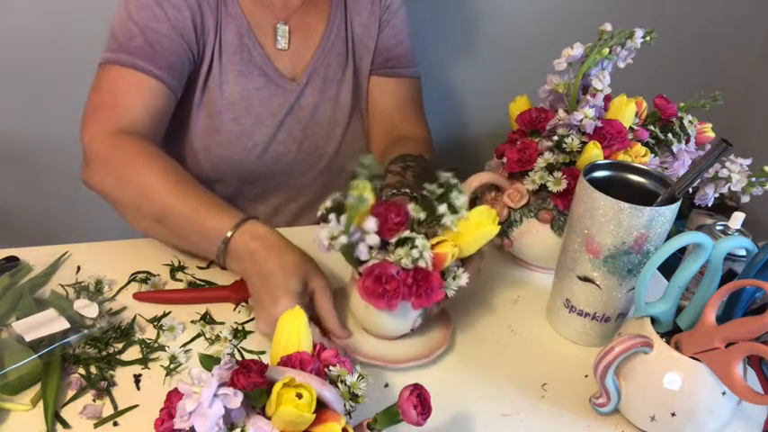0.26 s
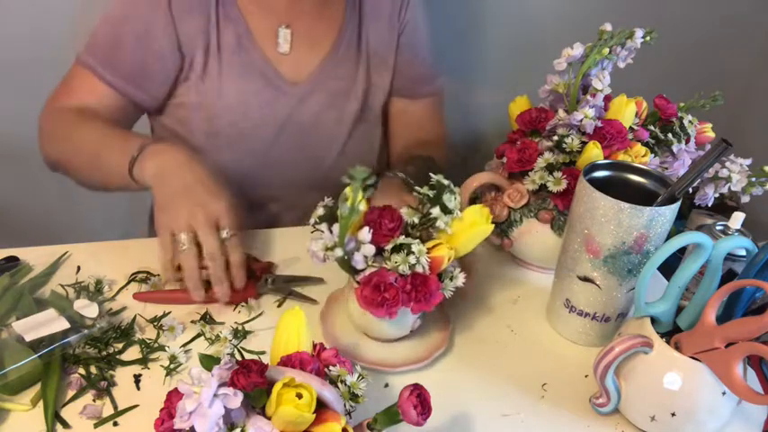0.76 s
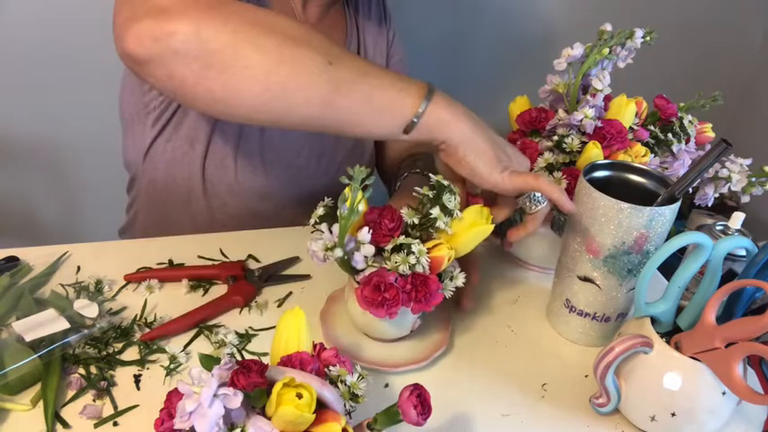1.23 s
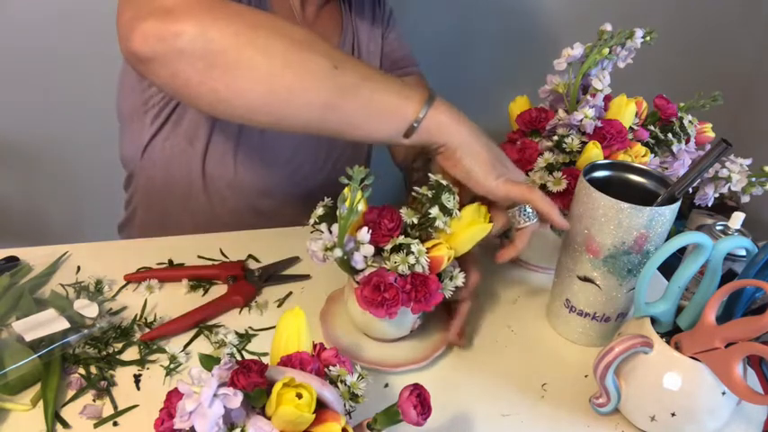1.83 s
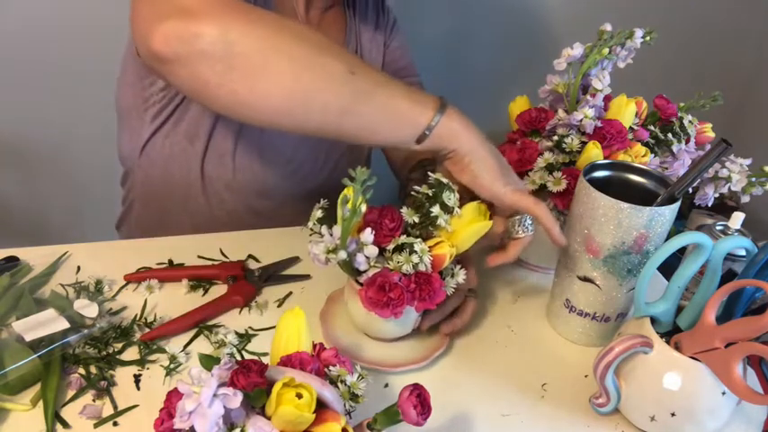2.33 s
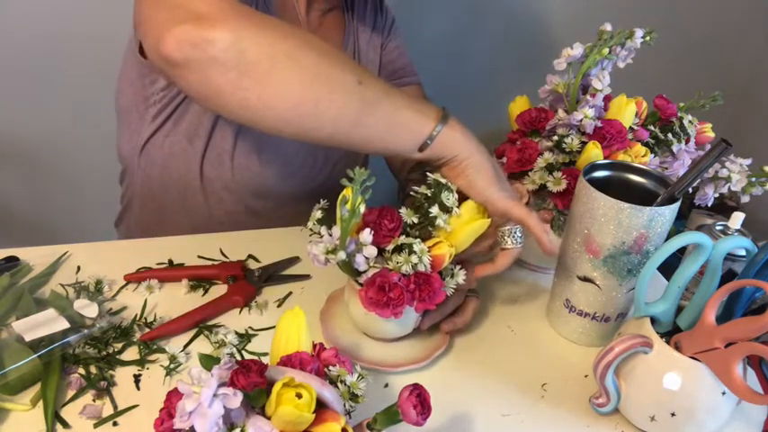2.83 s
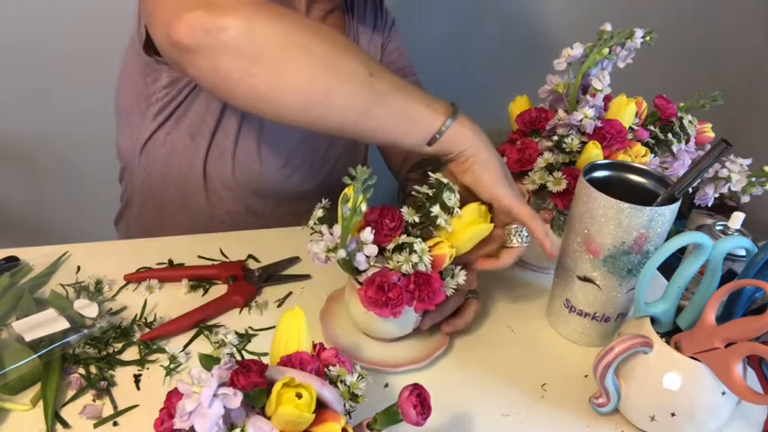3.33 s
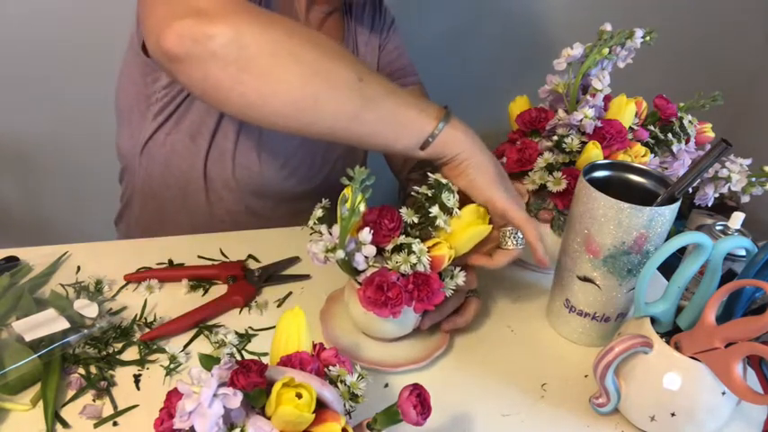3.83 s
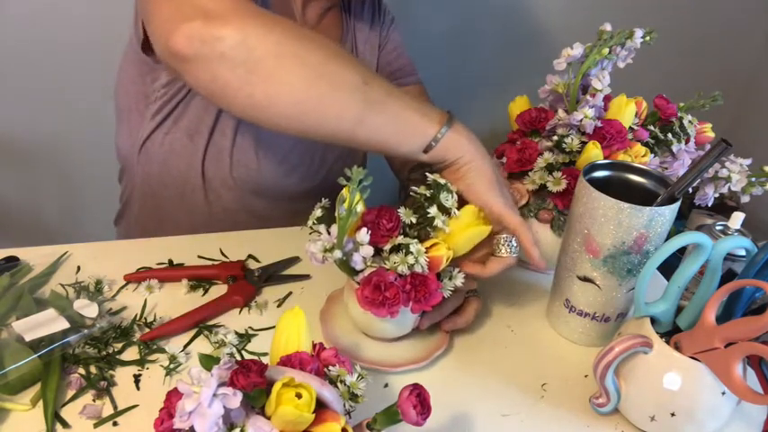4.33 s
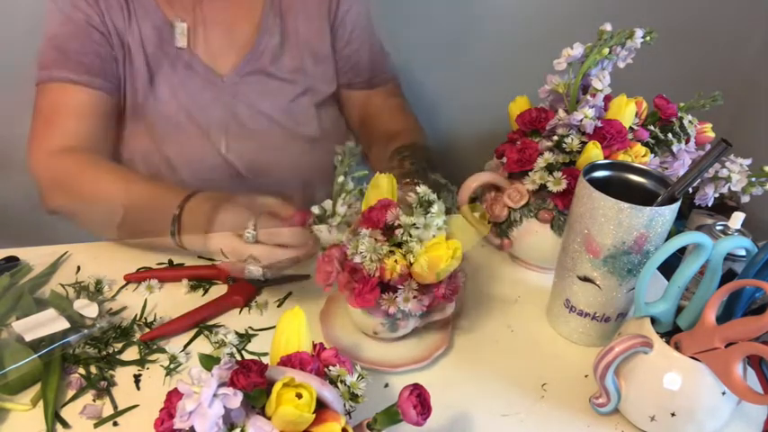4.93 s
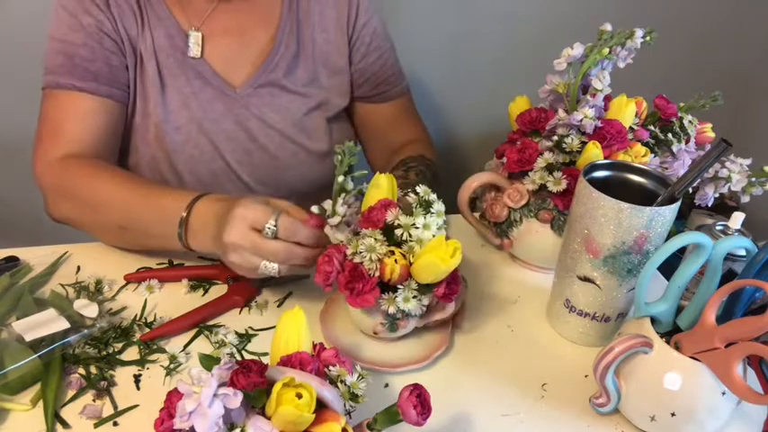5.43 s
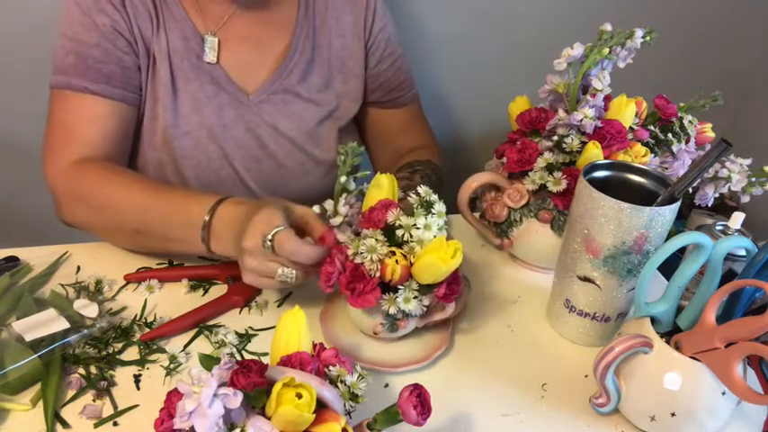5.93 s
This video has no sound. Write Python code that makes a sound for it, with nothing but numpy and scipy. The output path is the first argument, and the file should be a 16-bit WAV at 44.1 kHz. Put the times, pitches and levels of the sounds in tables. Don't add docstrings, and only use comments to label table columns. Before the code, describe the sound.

Heavy, damped china on china, heard very near, with a short small-room reflection. An opening clatter and dull tabletop knock give way to scraping, rattling contacts as the cup is rotated, then a softer landing. Quiet middle: faint motor hum, brushed leaves, isolated thin rim pings. Late scrapes and nudges build to one hard, bright set-down with a fast rocking rattle, then soft rustles and stem ticks.

```python
import sys
import numpy as np
from scipy import signal
from scipy.fft import rfft, irfft, next_fast_len
from scipy.io import wavfile
from scipy.ndimage import uniform_filter1d

SR = 44100
rng = np.random.default_rng(int(sys.argv[2]) if len(sys.argv) > 2 else 0)


def log_audio(samples):
    frames = np.atleast_2d(samples).T
    limited = np.clip(frames, -1, 1)
    pcm = np.round(limited * 32767).astype(np.int16)
    wavfile.write(sys.argv[1], SR, pcm)


def voltage_ratio(decibels):
    exponent = np.asarray(decibels, float) / 20
    return 10 ** exponent


N = 272160

# pitch_hz [Hz], width_hz [Hz], level_db [dB]
CLACK = [(1960, 250, -7.5), (2413, 168, -8.5), (3100.6, 220, -2.5), (3818, 320, -4), (4220, 230, -8),
         (4656, 260, -7), (5361, 250, -13.5), (6281, 450, -12.5)]
# pitch_hz [Hz], width_hz [Hz], level_db [dB]
BOWL = [(459.7, 37, -15.5), (695.1, 150, -6), (898.4, 130, 2), (1057.1, 124.76, 2), (1399, 200, -1.5),
        (1667.1, 150, 2)]
# drag_db [dB], brush_db [dB], fizz_db [dB]
REST_DB = [-81.5, -83, -86]


def unit(x):
    return x / np.sqrt(np.mean(x ** 2) + 1e-20)


def along(points, hz):
    f, v = np.transpose(points)
    return np.interp(np.log(hz + 1), np.log(f + 1), v)


def filtered(x, response):
    m = next_fast_len(N + SR // 2)
    spectrum = rfft(x, m) * response(np.fft.rfftfreq(m, 1 / SR))
    return unit(irfft(spectrum, m)[:N])


def coloured(x, points):
    return filtered(x, lambda f: voltage_ratio(along(points, f)))


def add(track, s, db, x):
    track[round(s * SR):][:len(x)] += voltage_ratio(db) * x


def ring(modes, scatter_db, attack, detune, tilt_db=0, size=7000):
    t = np.arange(size) / SR
    hz, width, db = np.transpose(modes)[:, :, None]
    level_luck, pitch_luck = rng.standard_normal((2, len(modes), 1))
    level_db = db + scatter_db * level_luck + tilt_db * np.log2(hz / hz.mean())
    sense = (-1.) ** np.arange(len(modes))[:, None]
    waves = sense * np.sin(2 * np.pi * hz * (1 + detune / 100 * pitch_luck) * t)
    decay = np.exp(-np.pi * abs(width) * t)
    x = (voltage_ratio(level_db) * decay * waves).sum(0) * (1 - np.exp(-t / attack)) ** 2
    return x / abs(x).max()


def muffled(modes, soft_db):
    return [(hz, width, db - max(soft_db, 0) * max(np.log2(hz / 1102.6), 0)) for hz, width, db in modes]


def chatter(x, db):
    when, size = rng.random((2, 6))
    taps = np.zeros(SR // 100)
    taps[(when * .007 * SR).astype(int) + 20] = voltage_ratio(db - 10 * when) * (2 * size - 1)
    taps[0] = 1
    return signal.fftconvolve(x, taps)


def strokes(rows, rest_db):
    t = np.arange(N) / SR
    power = voltage_ratio(rest_db) ** 2
    for s, rise, fade, db in rows:
        fall_db = 20 * np.maximum((s - t) / abs(rise), (t - s) / abs(fade))
        power = power + voltage_ratio(db - fall_db) ** 2
    return np.sqrt(power)


def grit(share, patchy_db):
    grains = (rng.random(N) < .04) * rng.standard_normal(N)
    z = signal.stft(share * unit(grains) + rng.standard_normal(N), nperseg=256)[2]
    field = uniform_filter1d(rng.standard_normal(z.shape), size=3, axis=0)
    field = uniform_filter1d(field, size=20, axis=1)
    return signal.istft(z * voltage_ratio(patchy_db * unit(field)), nperseg=256)[1][:N]


def resonances(modes):
    def response(f):
        total = 0
        for k, (hz, width, db) in enumerate(modes):
            total = total + (-1) ** k * voltage_ratio(db) * 1j * f * width / (hz * hz - f * f + 1j * f * width)
        return total
    return response


def room_tone():
    # pitch_hz [Hz], density_db [dB per Hz]
    air_curve = [(41, -22), (70, -0.5), (86, -23), (108, -2.5), (189, -3), (408, -14), (446, -14.5),
                 (489, -11), (803, -21.5), (962, -18.5), (1510, -27), (4900, -36.5), (15500, -42)]
    # pitch_hz [Hz], peak_db [dB]
    motors = [(53.7, -67.5), (58.82, -65.3), (120, -69)]
    # middle_s [s], half_width_s [s], depth_db [dB]
    ducks = [
        (.92, 0.0885, 6),
        (4.8, 0.17635, 2),
    ]
    start_db, sag_db_per_s, together_s = -59, 0.6261, 2.165
    t = np.arange(N) / SR
    air = filtered(rng.standard_normal(N), lambda f: voltage_ratio(along(air_curve, f)) * (f < 15900))
    hum = sum(voltage_ratio(db + 61) * np.cos(2 * np.pi * hz * (t - together_s)) for hz, db in motors)
    dips_db = sum(db * np.exp(-((t - s) / width) ** 2) for s, width, db in ducks)
    return voltage_ratio(start_db - sag_db_per_s * t - dips_db) * (air + hum)


def tinkles():
    # start_s [s], rim_db [dB], saucer_db [dB], upper_db [dB over rim]
    grazes = [(0.0054, -61, -70, -7.5), (0.0135, -53.5, -66, -11), (0.041, -57.5, -68.5, -1.5),
              (0.0636, -48.5, -45.5, 3.5), (0.2809, -72, -78.5, -4), (0.3093, -67.5, -67, -9.5),
              (.325, -76, -65, -0.5), (0.3388, -69.5, -68, -2.5), (.349, -74, -61.5, 5.5),
              (0.358, -64.5, -60, -3), (0.368, -74, -83.5, 8.5), (0.3918, -58, -73, -9.5),
              (0.6609, -63.5, -75.5, -4), (0.6992, -62.5, -77.5, -4.5), (1.7991, -71.5, -72.5, 0),
              (1.988, -65.5, -77, -5), (2.1938, -62.5, -73.5, -4.5), (2.212, -63.5, -84.5, 1),
              (2.2449, -66.5, -84.5, -3), (2.8208, -75, -85, -2.5), (3.0567, -52.5, -73.5, -4.5),
              (3.476, -60.5, -80, -8.5), (4.1863, -75, -82.5, 0.5), (4.223, -60.5, -82, -9.5),
              (4.245, -78, -82.5, -8), (4.265, -71, -84, -11), (4.2843, -63.5, -90, -25.5),
              (4.425, -59, -84.5, -8.5), (6.1138, -63.5, -81, -10.5)]
    # pitch_hz [Hz], width_hz [Hz], level_db [dB]
    rim_modes = [
        [(4240, 45, -4), (4350, 35, 0)],
        [(4600, 35, 0)],
        [(7000, 30, 0), (7150, 40, -7), (7300, 40, -4)],
        [(10530, 35, 0), (11360, 50, -6)],
        [(9560, 30, 0), (12100, 30, -2)],
    ]
    upper_shares = [6, -2.5, -12.5]
    out = np.zeros(N + SR)
    for s, rim_db, saucer_db, upper_db in grazes:
        levels_db = [rim_db - 4, saucer_db + 4] + [rim_db + upper_db + db for db in upper_shares]
        for modes, db in zip(rim_modes, levels_db):
            add(out, s, db, ring(modes, scatter_db=3, attack=.0008, detune=.4))
    return out[:N]


def china_contact(out, s, clack_db, bowl_db, crack_db):
    # pitch_hz [Hz], width_hz [Hz], level_db [dB]
    crack_modes = [(7300, 1100, 0), (8600, 1200, -1), (10200, 1300, -1), (11800, 1400, -3),
                   (13500, 1500, -8), (15000, 1500, -12)]
    tilt_db = max(clack_db - bowl_db - 13.5, -24.5)
    clack = ring(CLACK, scatter_db=1.5, attack=.00012, detune=1.5, tilt_db=tilt_db, size=1500)
    add(out, s + .0006, clack_db - 1.5, chatter(clack, db=-9))
    bowl_modes = muffled(BOWL, .8 * (bowl_db - clack_db + 5.5))
    add(out, s + .001, bowl_db + 5.5, ring(bowl_modes, scatter_db=1.6, attack=.00024, detune=1, size=2500))
    crack = ring(crack_modes, scatter_db=3, attack=.0001, detune=4, size=400)
    add(out, s + .0006, crack_db + 8.5, chatter(crack, db=-5))


def contacts():
    # start_s [s], clack_db [dB peak], bowl_db [dB], crack_db [dB]
    set_downs = [(0.0537, -33, -46.5, -56), (0.067, -21.5, -25.5, -46.5), (0.0832, -27.5, -54.5, -45.5),
                 (0.0941, -36, -52, -53.5), (0.1, -35.5, -48, -45.5), (0.1041, -32.5, -50, -57),
                 (0.1086, -28, -45.5, -52), (0.196, -32, -44, -75), (0.7294, -47.5, -51.5, -65),
                 (0.7503, -33.5, -50.5, -48.5), (0.7532, -31.5, -43.5, -55), (0.765, -38.5, -39.5, -61),
                 (0.7698, -22.5, -40, -37), (0.7809, -42, -50, -62), (0.801, -38.5, -45.5, -62.5),
                 (0.8118, -40.5, -43, -64.5), (0.8397, -41, -46.5, -68), (1.884, -42.5, -52, -58.5),
                 (1.889, -25, -44.5, -52.5), (1.8955, -34, -53.5, -42.5), (1.9003, -35.5, -52, -58.5),
                 (1.9107, -43.5, -55, -65.5), (2.0695, -49.5, -62, -66), (2.0761, -47.5, -57, -60.5),
                 (2.1011, -36.5, -49.5, -60.5), (2.0956, -28.5, -47, -51), (4.907, -60, -53, -89),
                 (4.941, -69, -56, -85), (4.957, -67, -51, -82.5), (4.9834, -32, -40, -71),
                 (4.9896, -17, -31, -51), (5, -9, -26.5, -39.5)]
    # start_s [s], clack_db [dB peak], bowl_db [dB], crack_db [dB]
    rocks = [(.125, -16, -37, -43.5), (.138, -20.5, -37.5, -50.5), (0.1476, -22.5, -39, -54),
             (0.155, -29.5, -46, -62.5), (.1608, -27, -42.5, -62), (.1712, -32, -44, -65.5),
             (5.0035, -24, -36, -59.5), (5.008, -27.5, -42, -61), (5.0116, -27.5, -38, -58),
             (5.022, -14.5, -32, -44.5), (5.0344, -19, -33.5, -50), (5.0413, -23, -38, -58),
             (5.0489, -29.5, -40.5, -62), (5.0557, -32, -43, -48.5), (5.0716, -37, -46, -70),
             (5.08, -34, -42.5, -72)]
    # start_s [s], clack_db [dB peak], bowl_db [dB], crack_db [dB]
    turns = [(1.0032, -46, -61, -67), (1.05, -25.5, -29.5, -68), (1.134, -40, -49, -72),
             (1.159, -42.5, -46.5, -61.5), (1.211, -27, -31.5, -43), (1.2578, -14.5, -28.5, -47.5),
             (1.2705, -12.5, -23, -51), (1.2769, -33, -38.5, -64), (1.292, -41.5, -50.5, -70.5),
             (1.327, -45.5, -48.5, -76.5), (1.3515, -38.5, -46, -76), (1.3141, -39.5, -42, -74),
             (1.3601, -45.5, -46.5, -64), (1.3798, -51, -46, -76.5), (1.3887, -37, -43.5, -77.5),
             (1.4, -36.5, -41, -77), (1.4538, -58.5, -50.5, -74), (1.4957, -43, -43.5, -79),
             (1.4994, -37, -43.5, -77.5), (1.5038, -39, -44.5, -78), (1.508, -34, -42.5, -76),
             (1.5192, -34.5, -42.5, -78), (1.5223, -26, -34, -74.5), (1.533, -37.5, -43.5, -73),
             (1.5475, -37.5, -46.5, -70.5), (1.5506, -39, -47.5, -70.5), (1.5697, -36, -44, -69),
             (1.5881, -37.5, -48, -65.5), (1.605, -33, -40.5, -56.5), (1.6401, -32, -38, -63.5),
             (1.6447, -32.5, -35.5, -56.5), (1.6554, -37.5, -46, -52.5), (1.6639, -43.5, -47.5, -60.5),
             (1.685, -49.5, -44.5, -77), (1.7149, -34, -44, -62), (1.733, -42, -44.5, -70.5),
             (1.7605, -35, -46, -54.5), (1.7655, -38, -40.5, -69)]
    # start_s [s], clack_db [dB peak], bowl_db [dB], crack_db [dB]
    nudges = [(3.0533, -51, -64, -62), (3.058, -50.5, -50.5, -78), (4.5365, -41, -50, -77),
              (4.5781, -61.5, -43.5, -75), (4.591, -48, -47.5, -56), (4.6155, -54.5, -43.5, -70.5),
              (4.6276, -42.5, -41, -68), (4.6358, -36.5, -41, -52.5), (4.6692, -24.5, -36, -42.5),
              (4.6756, -38, -42.5, -63), (4.68, -44, -43.5, -69), (4.7132, -40, -45, -58),
              (4.7216, -46.5, -45.5, -75), (4.7402, -49, -55, -59), (4.75, -31.5, -40.5, -77.5),
              (4.7563, -39.5, -47.5, -78), (5.3727, -53, -57, -75)]
    # start_s [s], clack_db [dB peak], crack_db [dB]
    stems = [(0.6274, -56.5, -62), (0.647, -58, -61), (1.0953, -47.5, -70), (1.1802, -58, -70),
             (1.4704, -43.5, -55), (1.5955, -45.5, -54.5), (1.737, -34, -46), (3.476, -55, -63.5),
             (4.144, -58, -70), (4.3148, -63.5, -60.5), (4.319, -51, -52.5), (5.826, -80, -65),
             (5.887, -70.5, -58), (5.9819, -71, -66), (6.065, -68, -63.5), (6.1129, -59.5, -66.5)]
    out = np.zeros(N + SR)
    for s, clack_db, bowl_db, crack_db in set_downs + rocks + turns + nudges:
        china_contact(out, s, clack_db, bowl_db, crack_db)
    for s, clack_db, crack_db in stems:
        china_contact(out, s, clack_db, clack_db - 18, crack_db)
    return out[:N]


def knocks():
    # start_s [s], peak_db [dB], thump_db [dB], hardness_db [dB]
    blows = [(0.065, -6, -34.5, -12), (0.3635, -21, -38.5, -19), (0.603, -43, -54, -46),
             (0.817, -31, -48, -39.5), (0.824, -44, -51, -27.5), (0.847, -40, -57.5, -43),
             (2.968, -58.5, -77.5, 6.5), (4.354, -48.5, -57.5, -24), (4.411, -44, -56.5, -18.5),
             (4.424, -38, -55.5, -23.5), (4.807, -44, -59.5, -49), (5.0, -27.5, -55, -14.5),
             (0.61, -46, -65.5, -40), (4.83, -50, -62, -45.5)]
    # pitch_hz [Hz], width_hz [Hz], level_db [dB]
    board_modes = [(435, 60, -14), (573, 82.1, -8), (727.5, 63, -14.5), (934.3, 130, 0), (1058.5, 150, 3.5),
                   (1355, 150, -4.5), (1691.8, 170, 2), (2646.6, 160, -20.5)]
    # pitch_hz [Hz], width_hz [Hz], level_db [dB]
    thump_modes = [(126, 45, -17), (207.7, 31, -7.5), (281.35, 36.1, -4)]
    out = np.zeros(N + SR)
    for s, db, thump_db, hard_db in blows:
        soft_db = -10 - db
        attack = .002 + .000097 * min(max(soft_db, 0), 15)
        modes = muffled(board_modes, min(1.8 * soft_db, 19))
        tilt_db = .24 * (hard_db + 13.5)
        add(out, s, db - .5, ring(modes, scatter_db=1.5, attack=attack, detune=1, tilt_db=tilt_db))
        add(out, s, thump_db + 9, ring(thump_modes, scatter_db=2, attack=.0042, detune=2))
    return out[:N]


def buzz():
    # top_s [s], level_db [dB]
    sizzles = [
        (.07, -63),
        (1.87, -70),
        (5.001, -49),
    ]
    rise_s, fade_s = .006, .07
    hiss = filtered(rng.standard_normal(N), lambda f: np.exp(-((f - 15600) / 300) ** 2))
    return hiss * strokes([(s, rise_s, fade_s, db) for s, db in sizzles], -120)


def dragging():
    # top_s [s], swell_s [s per 20 dB], fade_s [s per 20 dB], level_db [dB], china_db [dB over bowl]
    drags = [(.08, .004, .2, -40, -8), (.32, 0.25, 0.1841, -58, -13.5), (.62, 0.09, 0.27, -57.5, -9.5),
             (.665, 0.04, 0.1447, -53, -11), (.72, 0.083, 0.0575, -51.5, -12.5),
             (.79, 0.13, 0.0634, -52, -9.5), (.845, 0.22, 0.01, -49, -7), (1.1, -0.22, 2.07, -67.5, -6.5),
             (1.2, 0.09, 0.29, -53.5, -9), (1.3, 0.0849, 0.1843, -46.5, -6),
             (1.503, -0.04, 0.2127, -46.5, -10), (1.65, .15, .1, -47, -8), (1.772, 0.37, .015, -47.5, -12),
             (1.87, 0.38, -0.02, -61.5, -8), (1.98, 0.21, 0.0244, -61.5, -7),
             (2.12, 0.13, 0.1224, -59.5, -4.5), (2.22, -0.04, 0.05, -62.5, -14.5),
             (2.45, 0.5, 0.28, -68, -4.5), (4.25, 0.14, 0.35, -64, -6.5), (4.36, 0.05, 0.12, -59, -5),
             (4.55, 0.0487, 0.1326, -58.5, 2), (4.585, .03, .05, -51, -16), (4.635, .05, .05, -47, -11),
             (4.73, -0.1, 0.0941, -52, -8), (2.97, 0.02, 0.0273, -63, -1.5),
             (4.95, 0.23, 0.25, -60.5, -15.5), (5.05, .04, .11, -44.5, -3), (5.76, 1.5, 0.59, -70.5, -6.5),
             (6.02, 0.96, 4, -78.5, -7)]
    bowl = [(hz, width, db - 7 * np.log2(hz / 1000)) for hz, width, db in BOWL]
    china = [(hz, .9 * width, db) for hz, width, db in CLACK]
    scrapes = [(s, rise, fade, db + china_db) for s, rise, fade, db, china_db in drags]
    slips = grit(1.4, patchy_db=4.5)
    low = strokes([row[:-1] for row in drags], REST_DB[0]) * filtered(slips, resonances(bowl))
    high = strokes(scrapes, REST_DB[0] - 7.5) * filtered(slips, resonances(china))
    return voltage_ratio(-3) * low + voltage_ratio(-3.5) * high


def brushing():
    # top_s [s], swell_s [s per 20 dB], fade_s [s per 20 dB], level_db [dB], fizz_db [dB over leaves]
    brushes = [(.09, .08, 0.6, -64, -14.5), (.2, 0.27, 3, -77, -24), (.62, 0.2521, 0.73, -67, -10),
               (.785, 0.07, 0.0526, -50, -11), (1.1, -0.23, 2.5, -77.5, -19),
               (1.3, 0.0023, 0.0376, -53, -28), (1.65, -0.38, 0.16, -58.5, -17),
               (1.92, 0.0822, 0.0078, -53, -20), (1.99, 0.18, 0.1352, -61, -14.5),
               (2.075, .02, 0.05, -60.5, -13), (2.14, 0.0961, 0.1128, -59.5, -15),
               (2.37, 0.11, 0.3, -65.5, -8.5), (2.49, -0.04, 0.21, -65.5, -12.5),
               (2.545, 0.1, -0.0867, -65, -10.5), (2.98, 0.19, 0.28, -67.5, -6),
               (3.18, 0.1235, 0.34, -71.5, -10), (3.95, 0.0878, 0.052, -59.5, -12),
               (4.361, 0.1023, 0.039, -62.5, -5), (4.53, 0.05, 0.25, -69, -24.5),
               (4.7, 0.49, -0.02, -66, -16), (4.815, 0.0447, 0.0467, -63, -27),
               (5.08, -0.067, 0.2142, -55.5, -31), (5.27, 0.0454, 1.78, -69.5, -9.5),
               (5.469, 0.07, 0.2464, -65.5, -6), (5.639, 0.18, 0.1259, -61, -15), (5.95, .5, .5, -74.5, -5)]
    # pitch_hz [Hz], density_db [dB per Hz]
    leaf_curve = [(1000, -36), (1900, -6), (3200, -7), (4600, -1), (5500, -5.5), (7000, -7.5), (9500, -26)]
    # pitch_hz [Hz], density_db [dB per Hz]
    fizz_curve = [(4000, -26), (7000, -4), (10000, -7), (13000, -10), (15600, -16), (16000, -21)]
    fizzes = [(s, rise, fade, db + fizz_db) for s, rise, fade, db, fizz_db in brushes]
    rustle = strokes([row[:-1] for row in brushes], REST_DB[1]) * coloured(grit(.5, patchy_db=1.5), leaf_curve)
    fizz = strokes(fizzes, REST_DB[-1]) * coloured(grit(.4, patchy_db=3), fizz_curve)
    return voltage_ratio(-1.5) * rustle + voltage_ratio(4) * fizz


def bud_tap():
    # start_s [s], peak_db [dB], modes of pitch_hz [Hz], width_hz [Hz], level_db [dB]
    bud = (2.69, -56, [(4845, 223.5, 2), (5230, 300, -1.5)])
    s, db, modes = bud
    out = np.zeros(N + SR)
    add(out, s, db, ring(modes, scatter_db=1, attack=.0003, detune=1, size=900))
    return out[:N]


def walls(x, stretch=SR // 4):
    # pitch_hz [Hz], t60_s [s]
    decay_times = [(150, 0.27), (600, 0.28), (1500, 0.21), (4000, 0.17), (10000, 0.14), (15000, 0.08)]
    out = np.zeros(N + SR)
    for start in range(0, N, stretch):
        hz, t, z = signal.stft(rng.standard_normal(SR // 2), SR, nperseg=256)
        decay = voltage_ratio(-60 * t / along(decay_times, hz)[:, None])
        tail = signal.istft(z * decay, SR, nperseg=256)[1]
        echo = signal.fftconvolve(x[start:start + stretch], tail / np.linalg.norm(tail))
        add(out, start / SR + .003, 0, echo)
    return out[:N]


def scene():
    hits = tinkles() + contacts() + knocks() + bud_tap()
    return (room_tone() + hits + voltage_ratio(-9.5) * walls(hits) + dragging() + brushing())[None]


def low_pass(x):
    return signal.sosfilt(signal.butter(12, 16770, fs=SR, output="sos"), x)


def record(dry):
    band = signal.butter(5, [30, 15900], "band", fs=SR, output="sos")
    return low_pass(signal.sosfilt(band, dry + buzz()))


dry = scene()
out = record(dry)
log_audio(out)
```